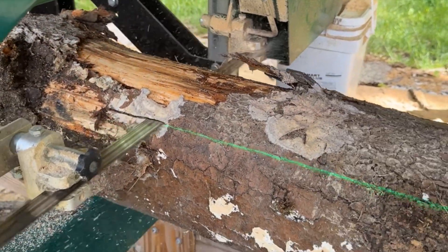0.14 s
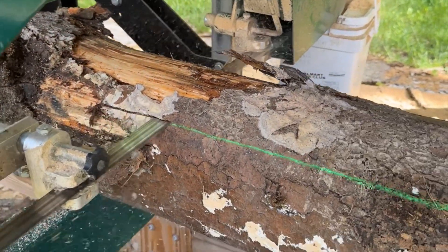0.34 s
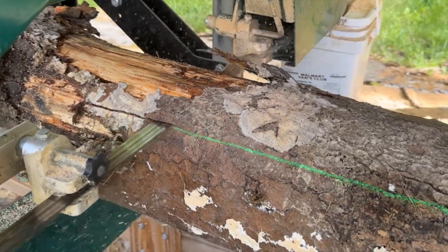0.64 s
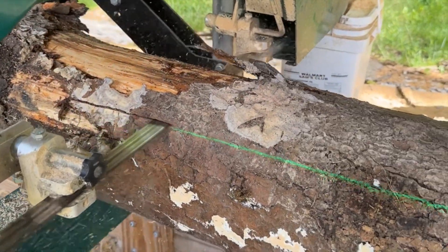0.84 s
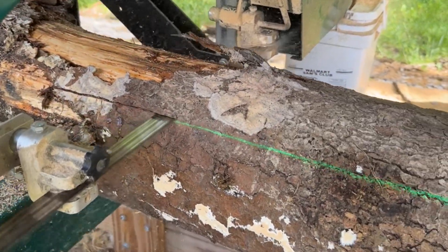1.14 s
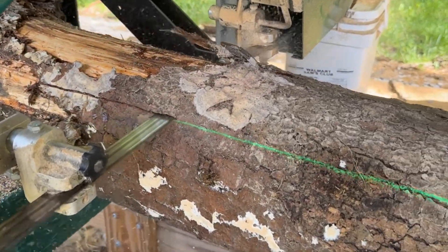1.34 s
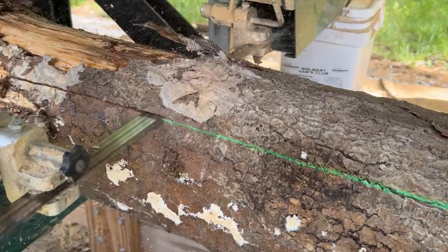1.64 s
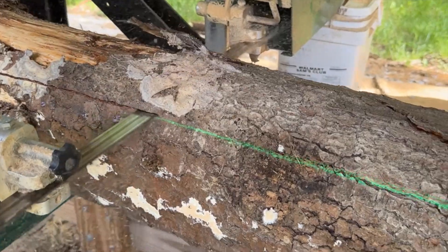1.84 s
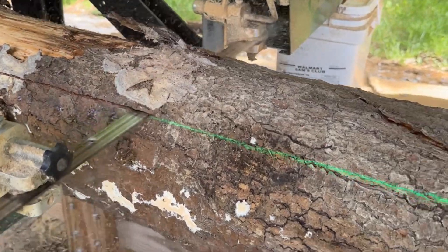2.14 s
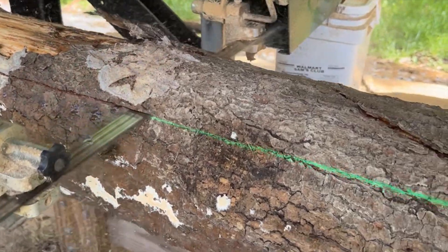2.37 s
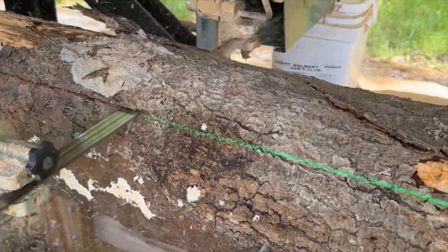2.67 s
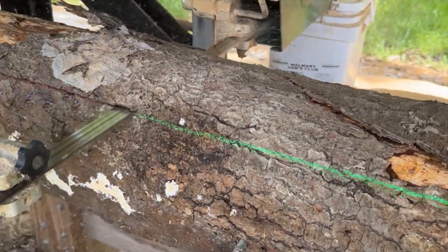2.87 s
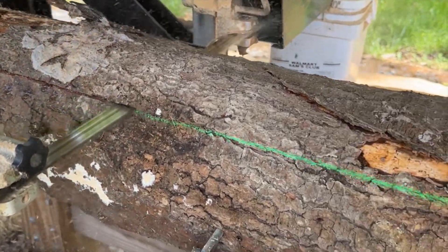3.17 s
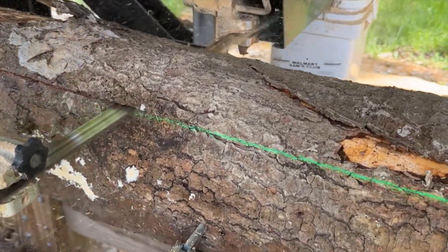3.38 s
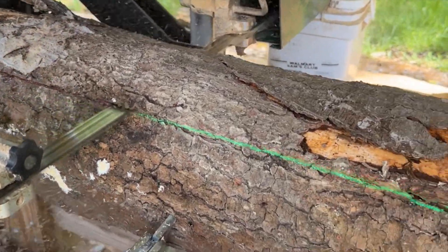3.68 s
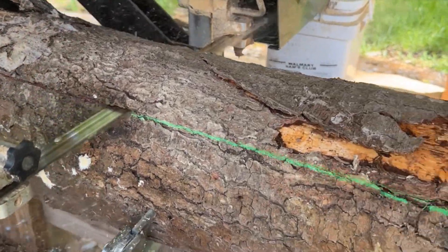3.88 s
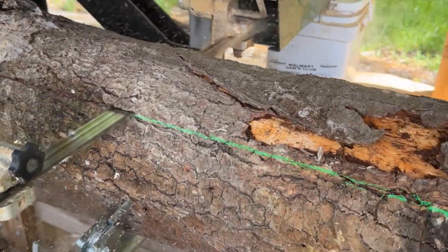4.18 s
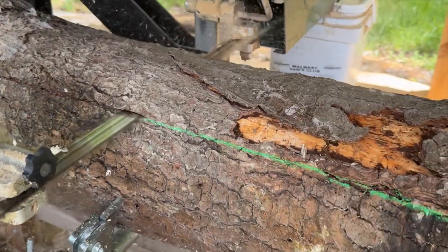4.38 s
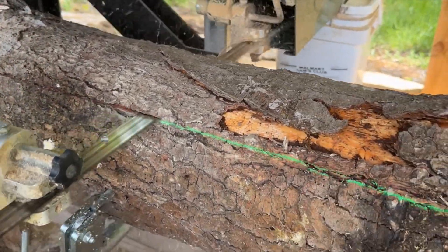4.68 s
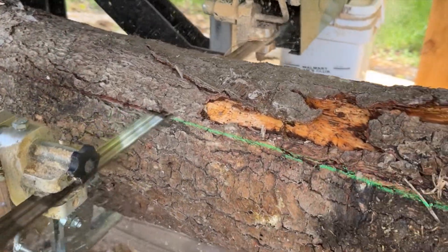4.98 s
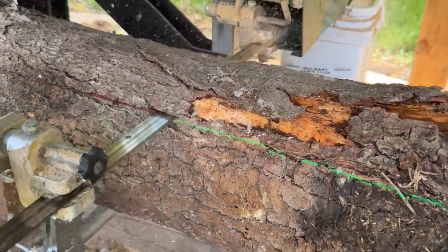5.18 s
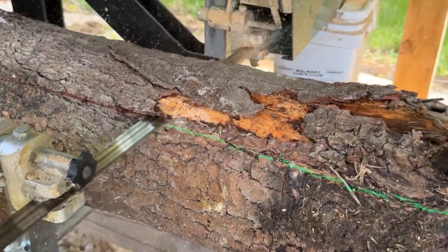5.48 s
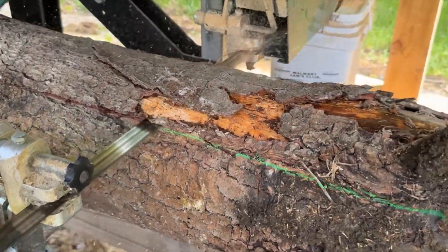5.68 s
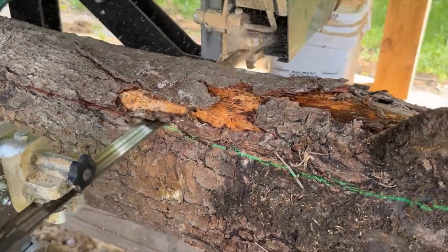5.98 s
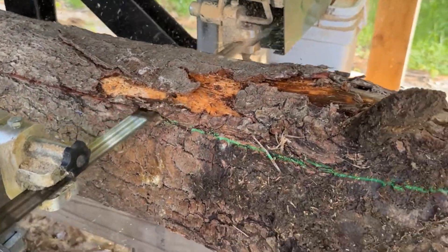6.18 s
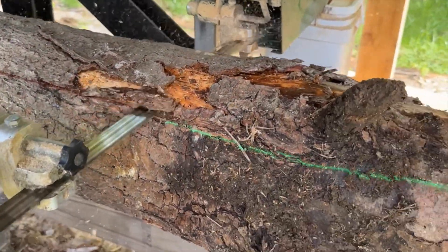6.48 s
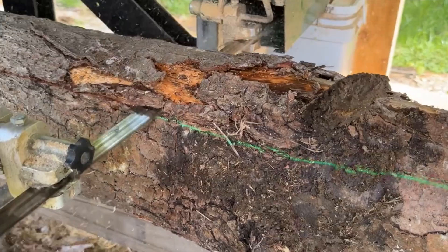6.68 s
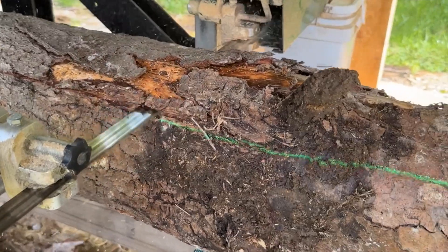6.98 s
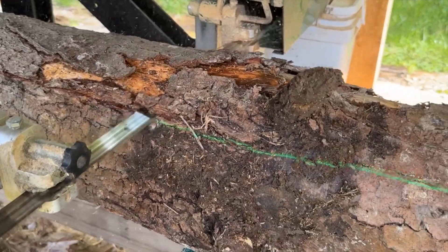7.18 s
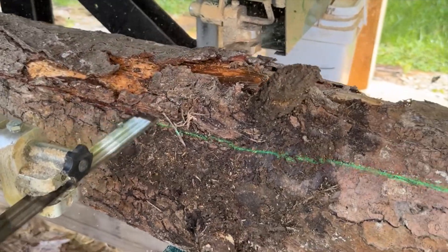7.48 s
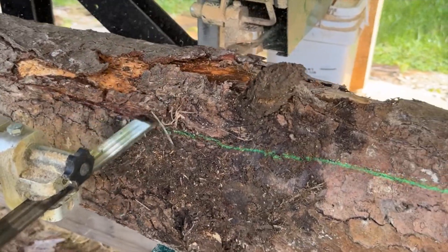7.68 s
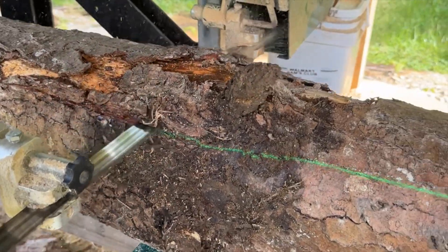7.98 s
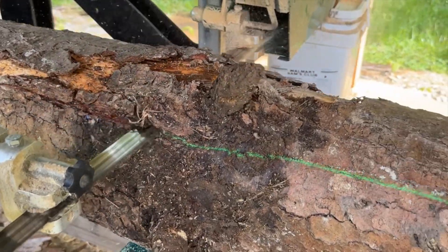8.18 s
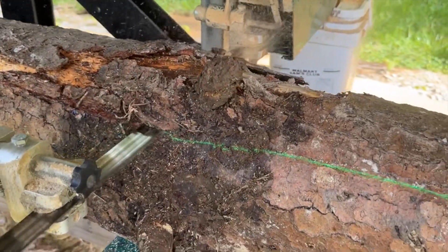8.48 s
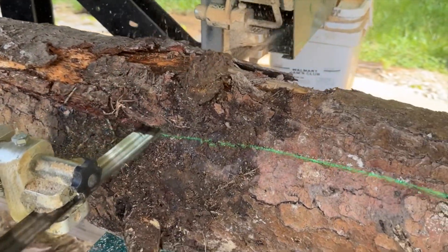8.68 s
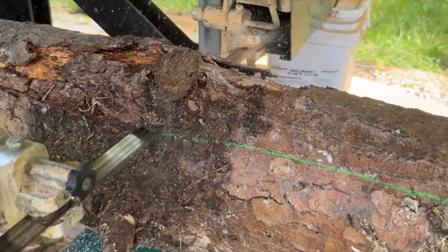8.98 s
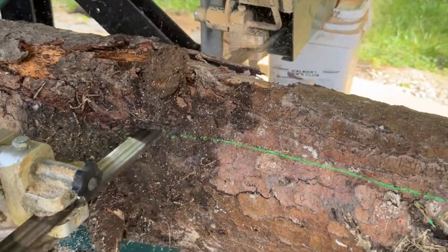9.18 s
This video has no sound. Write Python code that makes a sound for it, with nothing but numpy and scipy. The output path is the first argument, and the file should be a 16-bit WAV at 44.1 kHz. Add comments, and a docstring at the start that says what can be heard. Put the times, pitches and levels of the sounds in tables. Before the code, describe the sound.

A petrol engine throbs steadily outdoors while a sawmill's band blade rasps and sings lengthwise through a log, spraying hissing sawdust.

```python
"""A portable band sawmill cuts along a log; the engine throbs and the cut goes on throughout.
A four-stroke petrol engine near 3420 rpm sounds as a stack of orders, with pulsed noise for gas and metal.
Pulsed noise makes the rasp and the dusty spray with its chips; tones at tooth-pattern multiples sing.
Grips on the blade crowd between 4 and 6 s. The boom and a thin hum sink early on; the hum is back
from about 5 s, the boom near 8 s, and the hum is strongest at the end."""
import sys
import numpy as np
from scipy import signal
from scipy.fft import rfft, irfft
from scipy.io import wavfile
from scipy.ndimage import uniform_filter1d

SR = 44100
rng = np.random.default_rng(int(sys.argv[2]) if len(sys.argv) > 2 else 0)


def digitize_waveform(pressure):
    """Quantize a signal to 16-bit integers and store it at the path in sys.argv[1].

    Rows of a 2-D input are taken as channels; values are limited to [-1, 1].
    """
    field = np.atleast_2d(pressure).T
    bounded = np.clip(field, -1, 1)
    quanta = np.round(bounded * 32767).astype(np.int16)
    wavfile.write(sys.argv[1], SR, quanta)


N = 411453
T = np.arange(N) / SR
HZ = np.fft.rfftfreq(N, 1 / SR)
PATTERNS_PER_CYCLE = 9.537  # left-right-straight patterns of three teeth per engine cycle
# multiples of the pattern rate that sing: two to five times the tooth rate
SING_MULTIPLES = (6, 9, 12, 15)


def amp(db):
    """Decibels to gain."""
    return 10 ** (np.asarray(db) / 20)


def unit(x):
    """Scales to an rms of one."""
    return x / np.sqrt(np.mean(x ** 2) + 1e-20)


def curves(rows):
    """Interpolates each column of a timed table, sample by sample."""
    time_s, *columns = np.transpose(rows)
    return [np.interp(T, time_s, column) for column in columns]


def across(points):
    """Interpolates a table over frequency on a log axis."""
    freq_hz, value = np.transpose(points)
    return np.interp(np.log(HZ + 1), np.log(freq_hz + 1), value)


def drift(corner_hz):
    """Smooth chance of rms one, low-passed at corner_hz."""
    count, rate_hz = 8192, 800
    slow_hz = np.fft.rfftfreq(count, 1 / rate_hz)
    spectrum = rfft(rng.standard_normal(count)) / (1 + (slow_hz / corner_hz) ** 4)
    return np.interp(T, np.arange(count) / rate_hz, unit(irfft(spectrum)))


def coloured(x, density_db):
    """Shapes the spectrum of two channels, at an rms of one."""
    return unit(irfft(rfft(x) * amp(across(density_db)), N))


def puff(turns, decay_turns):
    """Once a turn: a jump that dies away, with a mean near one if the decay is short."""
    return np.exp(-(turns % 1) / decay_turns) / decay_turns


def pulsed_noise(power):
    """Two channels of white noise following a power envelope."""
    return rng.standard_normal((2, N)) * np.sqrt(power)


def exhaust(cycles, level_db=-24.0, wander_db=3.0, uneven=0.04, lead_cycles=-0.025):
    """Each firing rings the muffler; the rings overlap into a throbbing stack of engine orders."""
    # orders: order (multiple of the cycle rate), relative_db
    orders = [(1, -28), (2, -5), (3, -16.5), (4, -13), (5, 1), (6, -1), (7, -3), (8, 1), (9, -23),
              (10, -15.5), (11, -8), (12, -11.5), (13, -8.5), (14, -18.5), (15, -32), (16, -11),
              (17, -19.5), (18, -16.5), (19, -19), (20, -18), (21, -24), (22, -37), (23, -18), (24, -23.5),
              (26, -21.5), (28, -22), (32, -30), (34, -37), (36, -30.5), (38, -22)]
    # orders that swell on their own as the saw head travels; order: (time_s, change_db)
    own_changes = { 3: [(0, 0), (3.5, 6.5), (5.5, -4), (7.2, -19), (8.2, -9), (9.33, -3)], 5: [(0, 3.5),
                   (1.4, 3.5), (4.2, .5), (7.1, -4.5), (8, -2.5), (9.33, -5)], 6: [(0, 3), (1.95, -7),
                   (2.45, -1), (3.1, -7), (4.05, -12), (4.6, -2.5), (5.6, 3), (7.2, -5.5), (7.9, 0.5),
                   (9.33, 0.5)], 7: [(0, -8), (2.1, -20), (2.95, -25), (3.8, -1), (6.5, -2.5), (8.1, -1),
                   (9.1, -20)], 8: [(0, -0.5), (2, -0.8), (4.9, 3), (7.9, 0.5), (8.9, -5.5), (9.33, -2.5)],
                   9: [(0, 17), (3.2, 9), (4.4, 7), (6.1, -17), (7.5, -2), (9.33, -5)], 10: [(0, -9),
                   (1.2, -12), (2.2, 9), (3.5, 5.5), (4.5, 8), (6.5, -3), (8.3, 1), (9.33, 2)],
                   11: [(0, -1), (1.8, 2.5), (3.3, -0.5), (4.1, -4), (5.6, -12), (6.3, -2.5), (8.3, -0.5),
                   (9.33, -4)], 12: [(0, 2), (1.4, 1), (3, -7.5), (4.3, 2), (7.4, -3.5), (8.5, -11),
                   (9.33, -6)], 13: [(0, 0), (2.8, 2), (4.3, -8), (6.6, -1), (7.6, -2), (8.3, 4),
                   (9.33, 1.5)], 14: [(0, 1), (3, -2), (4.7, 5), (7, -2), (8, 1), (9.33, -6)], 16: [(0, -3),
                   (1.8, -11), (3.3, -4), (4.5, 6.5), (5.8, -2.5), (7.4, -10), (8.1, -3), (9.33, 1)],
                   18: [(0, -5), (1.3, 7), (2.3, -7), (4, -4), (5, 2.5), (6.8, -5), (7.8, 3.5), (9, 8.5),
                   (9.33, 3)], 26: [(0, -8), (3.8, -6), (4.7, -4), (5.7, -1), (8.2, 1), (8.9, 9.5),
                   (9.33, 7)]}
    # other orders below the muffler's resonance: time_s, change_db
    deep_changes = [(0, 1), (2.6, 1.5), (4.6, -1), (7.1, -2.5), (9.33, -2.5)]
    # other orders above it: time_s, change_db
    upper_changes = [(0, -4.5), (1.8, 0.5), (2.5, -1.5), (3.7, -3), (4.6, 1), (7.5, -4), (8.3, -4.5),
                     (9.33, 0)]
    # thin hum at the thirtieth order: time_s, peak_db
    hum_levels = [(0, -43), (2.5, -53), (4.9, -52), (5.25, -44), (5.8, -41), (7.7, -47), (8.3, -36),
                  (9.33, -34.5)]
    upper_from, shell_from = 9, 13  # first orders above the resonance, and out through the shell
    baffle_lag_rad, thump_order = 0.37, 6.3  # lag per squared distance from the thump's central order
    shell_delay_cycles, shell_scatter_rad = 0.1, 1.25
    firing_flutter = 0.006  # per order: radians, and share of strength

    deep_db, upper_db = curves(deep_changes)[0], curves(upper_changes)[0]
    hum_phase = 2 * np.pi * 30 * cycles + 0.54 * drift(6)
    out = amp(curves(hum_levels)[0]) * np.cos(hum_phase)
    for k, db in orders:
        if k in own_changes:
            change_db = curves(own_changes[k])[0]
        elif k < upper_from:
            change_db = deep_db
        else:
            change_db = upper_db + wander_db * drift(1.0)
        if k < shell_from:
            # higher orders take longer in the baffles: each thump rises in pitch as it dies
            lag = baffle_lag_rad * (k - thump_order) ** 2
        else:
            # shell orders keep loosely to the beat
            lag = 2 * np.pi * k * shell_delay_cycles + shell_scatter_rad * drift(0.39)
        phase = 2 * np.pi * k * (cycles + lead_cycles) - lag + firing_flutter * k * drift(21)
        strength = 1 + firing_flutter * k * drift(4.2)
        out -= amp(level_db + db + change_db) * np.sin(phase) * strength
    return out * (1 + uneven * drift(4.9))  # uneven firings


def roar(cycles, trim_db=3.5, pulsing=0.22, boom_pulsing=0.5):
    """Gas and cooling air rush, harder after each firing; the gas also booms in the muffler."""
    # rush: time_s, base_db (before the trim)
    rush_levels = [(0, -31), (1.5, -30.5), (3.5, -30.5), (4.7, -31), (6, -32.5), (7.2, -32), (8.3, -31.5),
                   (9.33, -32)]
    # boom: time_s, level_db
    boom_levels = [(0, -36), (2.5, -38), (3.6, -47), (7.3, -47), (8.3, -35), (9.33, -42)]
    # rush colour: freq_hz, density_db
    rush_density = [(20, -29), (45, -24), (70, -12), (125, -16.5), (185, -4.5), (250, -5.3), (340, -9),
                    (400, -7.5), (500, -7), (620, -10.5), (720, -10.5), (830, -9), (1100, -12.3),
                    (1600, -18.5), (4000, -45)]
    # boom colour: freq_hz, density_db
    boom_density = [(60, -40), (125, -16), (185, 0), (250, -8), (340, -18), (700, -45)]
    firing = puff(cycles + 0.11, 0.55)
    rush = coloured(pulsed_noise(1 + pulsing * firing), rush_density)
    boom = coloured(pulsed_noise(1 + boom_pulsing * firing), boom_density)
    return amp(curves(rush_levels)[0] + trim_db) * rush + amp(curves(boom_levels)[0]) * boom


def clatter(cycles, level_db=-42, decay_cycles=0.15):
    """The engine's metal clacks once a cycle: a decaying burst of noise."""
    # freq_hz, density_db
    clack_density = [(1500, -27), (3000, 3), (4500, -2), (7000, 0.5), (9000, -19), (14000, -25)]
    return amp(level_db) * coloured(pulsed_noise(puff(cycles + 0.095, decay_cycles)), clack_density)


def rasp(cycles, base_db, trim_db=1.0, surge=0.22, tick=0.015, grain_db=1.08, bite=0.33):
    """Each tooth tears the fibres; each power stroke tugs the band and the valve gear ticks."""
    # freq_hz, density_db
    rasp_density = [(400, -25), (900, -8), (1300, -0.5), (2000, 2), (2800, 3), (3600, -1.5), (4600, -6.5),
                    (6000, -8.5), (9000, -15.5)]
    beat = 1 + surge * puff(cycles + 0.13, 0.23) + tick * puff(cycles + 0.058, 0.04)
    teeth = 1 + bite * puff(3 * PATTERNS_PER_CYCLE * cycles, 1 / 4)
    tearing = pulsed_noise(beat * teeth) * amp(grain_db * drift(38))
    return amp(base_db + trim_db) * coloured(tearing, rasp_density)


def sawdust(cycles, base_db, trim_db=2.5, gust_db=1.0, pulsing=0.088,
            chips_per_s=900, chip_db=1.5, spread_db=3.0):
    """Pulsed noise with chance chips; it swells as the band comes round, and a little half way."""
    # freq_hz, density_db
    hiss_density = [(2000, -20.5), (4500, -7), (5200, -5.5), (5800, -3), (6900, -1.3), (7900, 4.2),
                    (8500, 1.5), (9300, .3), (10300, -3.2), (11700, -5.5), (12300, -.6), (13200, 1),
                    (14300, -3.2), (15800, -5)]
    loops = cycles / 5.8  # engine cycles per loop of the band
    spray = pulsed_noise(1 + pulsing * puff(cycles + 0.11, 0.54))
    sizes = amp(chip_db + spread_db * np.minimum(rng.exponential(1, (2, N)), 5))
    hits = rng.random((2, N)) < chips_per_s / SR
    chips = sizes * rng.choice([-1, 1], (2, N)) * hits
    loop_db = 0.4 * np.cos(2 * np.pi * loops) + 0.38 * np.cos(4 * np.pi * loops)
    level_db = base_db + trim_db + loop_db + gust_db * drift(31)
    return amp(level_db) * coloured(spray + chips, hiss_density)


def patchy(x, depth_db=1.13):
    """Chance drift in the colour of the cutting noise, smoothed over time and frequency."""
    _, _, z = signal.stft(x, SR, nperseg=512)
    field = rng.standard_normal(z.shape[1:])
    field = uniform_filter1d(field, size=9, axis=0)  # over frequency
    field = unit(uniform_filter1d(field, size=12, axis=1))  # over time
    return signal.istft(z * amp(depth_db * field), SR, nperseg=512)[1][:, :N]


def grips():
    """The wood grips the blade and lets go in a bell; returns the strength of the singing tones."""
    # peak_s, half_length_s, then base_db at two, three, four and five times the tooth rate
    grip_rows = [(.15, .2, -56, -60, -39, -60), (.78, .16, -59, -43, -45, -60),
                 (1.43, 0.1, -39, -41, -37, -58), (1.64, .17, -48, -40, -48, -61),
                 (2.32, .18, -40, -65, -38, -51), (2.51, 0.13, -34, -54, -50, -46),
                 (2.92, 0.15, -33, -47, -45, -54), (3.18, .17, -36, -60, -58, -58),
                 (3.55, .16, -40, -47, -48, -56), (3.88, .15, -41, -50, -46, -56),
                 (4.1, .17, -36, -40, -41, -54), (4.27, .16, -33, -36.5, -46, -48),
                 (4.5, .15, -43, -52, -41, -41), (4.77, 0.17, -45, -36.5, -47, -50),
                 (4.9, 0.24, -31.5, -36, -52, -48), (5.12, .08, -42, -41, -35.5, -43),
                 (5.25, 0.26, -35, -47, -41, -54), (5.59, .15, -36, -52, -50, -58),
                 (5.85, .2, -41, -43, -51, -50), (6.52, .2, -41, -46, -42.5, -47),
                 (7.36, .11, -50, -56, -43, -39), (7.6, .14, -39, -56, -56, -56),
                 (8.56, .11, -58, -39, -43, -54), (8.72, 0.17, -39, -47, -40, -44),
                 (8.93, .13, -41, -38, -52, -54), (9.11, 0.092, -37, -49, -50, -52)]
    power = np.zeros((len(SING_MULTIPLES), N))
    for peak_s, half_length_s, *tone_db in grip_rows:
        near = abs(T - peak_s) < half_length_s
        bell = np.cos(np.pi / 2 * (T[near] - peak_s) / half_length_s) ** 2
        power[:, near] += amp(tone_db)[:, None] ** 2 * bell
    return np.sqrt(power)


def blade(cycles, load_db, singing, sing_db=-0.2, ripple=0.0089, slip=0.016, jitter=0.0033,
          flicker=0.27, load_follow=0.83, bend=0.0089):
    """Tones of the passing teeth; crank ripple and uneven teeth smear the high ones most."""
    # multiple of the pattern rate, base_db
    teeth = [(3, -45), (4, -52), (5, -48.5), (6, -46.5), (7, -52), (8, -49), (9, -44), (10, -46),
             (11, -45.5), (12, -44), (13, -49.5), (14, -49), (15, -47), (16, -52), (17, -54.5), (18, -47),
             (21, -47.5), (22, -55), (24, -52), (26, -52)]
    # tones that swell and fade along the cut; multiple: (time_s, change_db)
    swells = { 3: [(0, -2), (1.9, -7), (2.25, 5), (2.75, -7), (3.2, 7), (4.1, -2), (4.7, 6), (5.3, -4),
              (9.33, -2)], 4: [(0, 1), (5.7, -4), (6.4, 13), (7.3, -7), (9.33, 6)], 5: [(0, -2), (2.7, -6),
              (3.5, 11), (3.9, -8), (5.5, 2), (6.6, 5), (7.5, -7), (9.33, -5)], 9: [(0, -7), (1.3, 2),
              (2.3, -3), (3.3, 1.5), (5, 3), (6.2, -2), (7.4, -1), (8.9, 2), (9.33, 0)], 12: [(0, -1),
              (1.9, 2), (3.4, -1), (4.3, 1), (6.1, 2), (7.1, -3), (8.4, -2), (9.33, -2)], 15: [(0, -1),
              (3.4, -2), (4.4, 3), (6.2, 2), (7, -3), (8.1, -1), (9.33, -2)], 18: [(0, -1), (1.3, -1),
              (3.3, -9), (4.4, 1), (5.9, 3), (6.6, 1), (7.7, 1), (9.33, -3)]}
    wander_db = 1.1  # chance swelling of the other tones
    flicker_from, flicker_db = 9, 2.4  # lowest flickering multiple, dB per unit of drift
    flutter_above, flutter_turns = 6, 0.18  # flutter starts above this multiple, full an octave up

    turns = PATTERNS_PER_CYCLE * cycles + ripple * np.sin(2 * np.pi * cycles) + slip * drift(8.4)
    effort_db = load_follow * (load_db - load_db.mean())
    sung = dict(zip(SING_MULTIPLES, amp(sing_db) * singing))
    out = np.zeros(N)
    for k, db in teeth:
        if k in swells:
            level_db = db + curves(swells[k])[0]
        else:
            level_db = db + effort_db + wander_db * drift(2.9)
        if k >= flicker_from:
            level_db = level_db + flicker_db * (np.minimum(drift(7.3), 1) - 0.5)
        # each tone rides its own bending wave of the band, so they do not line up into clicks
        phase_turns = k * (turns + jitter * drift(50) + bend * drift(12.3)) + rng.random()
        # short waves flutter in the kerf
        phase_turns += flutter_turns * np.clip(k / flutter_above - 1, 0, 1) * drift(45)
        strength = np.sqrt(2) * np.hypot(amp(level_db), sung.get(k, 0))
        out += strength * (1 + flicker * drift(25)) * np.cos(2 * np.pi * phase_turns)
    return out


def ports(direct, scattered, echo=0.08, echo_s=0.00431):
    """Two microphone ports: partly alike, with frequency-dependent phase and balance."""
    # freq_hz, phase_rad (left leads)
    port_phase = [(20, .12), (60, .22), (200, .28), (400, .22), (620, .45), (1000, .05), (1380, -.24),
                  (1720, 0), (6850, 0), (7000, .65), (7300, 1.3), (7500, 2.1), (7680, 3.14), (9650, 3.14),
                  (10200, 2.7), (11500, 2.05), (13200, 1.5), (14100, 1.1), (15400, .15)]
    # freq_hz, likeness (correlation of the ports, no unit)
    port_likeness = [(60, .94), (130, .92), (250, .89), (600, .72), (1000, .72), (1450, .92), (1720, .9999),
                     (6850, .9999), (7000, .78), (7400, .8), (7680, .9999), (9500, .9999), (9800, .88),
                     (11400, .6), (12800, .78), (14300, .58), (15400, .88)]
    # freq_hz, left_minus_right_db
    port_balance = [(60, -.4), (170, 1), (350, 1.9), (800, 3.2), (1300, 1), (1800, 0)]
    likeness = np.clip(across(port_likeness), -1, 1)
    common, apart = rfft(scattered)
    tones = rfft(direct)
    # an echo off the mill's frame reaches the two ports differently
    apart = apart + echo * tones * np.exp(-2j * np.pi * HZ * echo_s)
    common = (common + tones) * np.sqrt((1 + likeness) / 2)
    apart = apart * np.sqrt((1 - likeness) / 2)
    side = np.array([[1], [-1]])
    balance = amp(side * across(port_balance) / 2)
    turn = np.exp(0.5j * side * across(port_phase))
    return irfft((common + side * apart) * balance * turn, N)


def scene():
    """One crankshaft times everything: firings, teeth and the loop of the band."""
    # time_s, crank_rpm
    speed = [(0.0, 3418), (1.2, 3417), (1.6, 3412), (1.8, 3400), (2.4, 3427), (2.8, 3420), (3.4, 3417),
             (4.4, 3407), (5.8, 3430), (6.0, 3425), (7.0, 3448), (8.6, 3403), (8.8, 3380), (9.33, 3420)]
    # time_s, rasp_base_db, hiss_base_db
    cut = [(0, -32.5, -29), (.75, -33, -30), (1.35, -32, -28.5), (2.1, -33, -30.5), (3, -33, -29.5),
           (3.75, -34, -30), (4.3, -32, -29), (4.72, -32, -29), (5.3, -33, -28.5), (5.95, -34, -29.5),
           (6.45, -34, -30.5), (6.85, -34.5, -31), (7.65, -35, -29), (8.1, -34, -30.5), (8.6, -34, -29.5),
           (9.33, -32.5, -30.5)]
    cycles = np.cumsum(curves(speed)[0] / 60) / 2 / SR  # two crank turns a cycle
    rasp_db, hiss_db = curves(cut)
    engine_noise = roar(cycles) + clatter(cycles)
    cutting = rasp(cycles, rasp_db) + sawdust(cycles, hiss_db)
    tones = exhaust(cycles) + blade(cycles, rasp_db, grips())
    return ports(tones, engine_noise + patchy(cutting))


def record(dry):
    """The recorder's band limit: a linear-phase low-pass at 15.8 kHz."""
    lowpass = signal.firwin(801, 15800, window=("kaiser", 9), fs=SR)
    return signal.oaconvolve(dry, lowpass[None], "same")


dry = scene()
out = record(dry)
digitize_waveform(out)
```